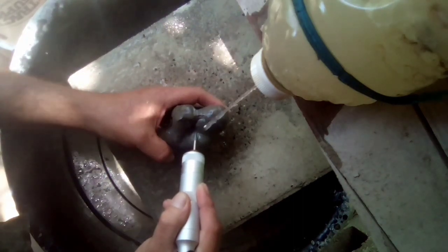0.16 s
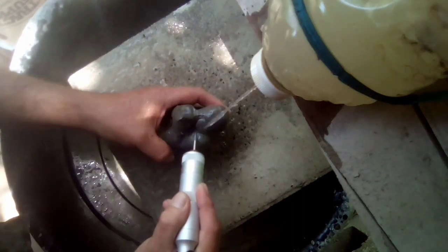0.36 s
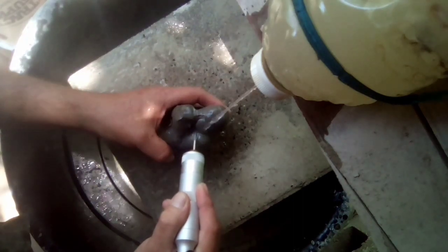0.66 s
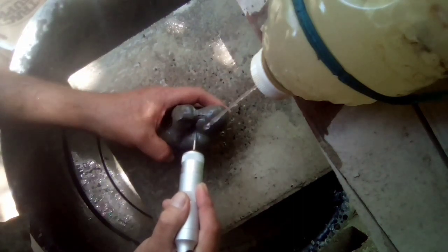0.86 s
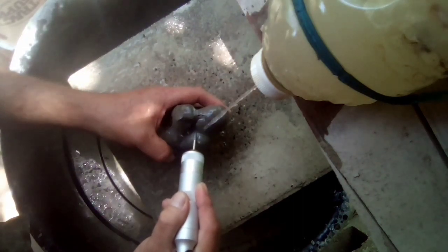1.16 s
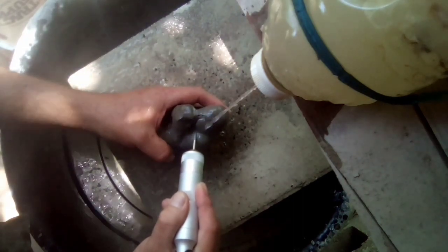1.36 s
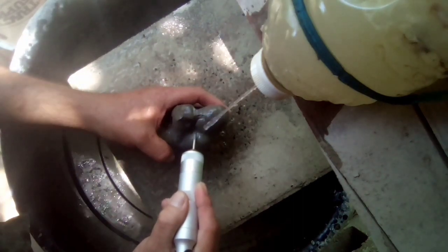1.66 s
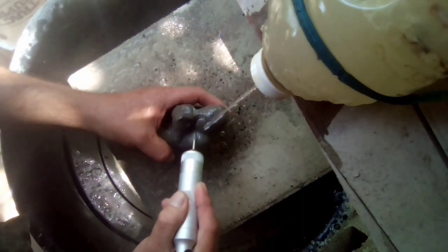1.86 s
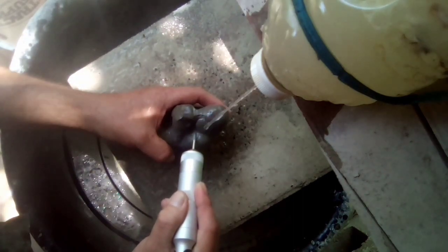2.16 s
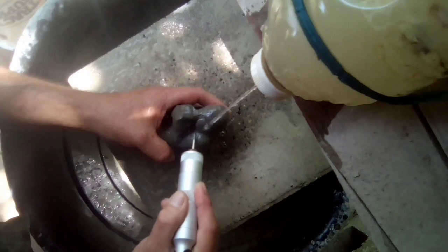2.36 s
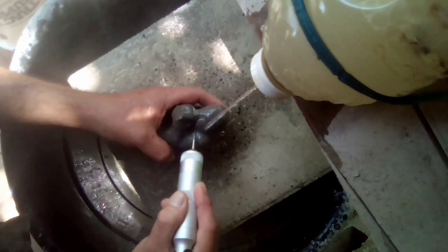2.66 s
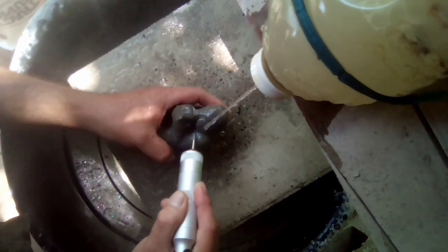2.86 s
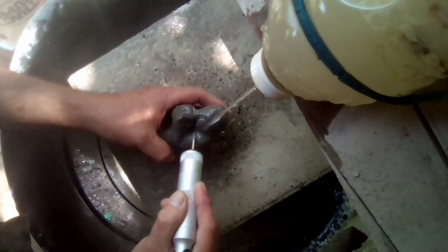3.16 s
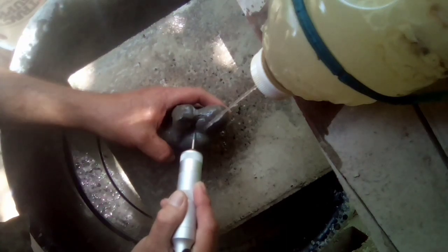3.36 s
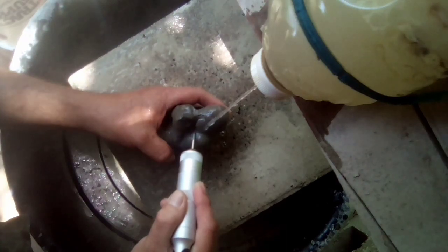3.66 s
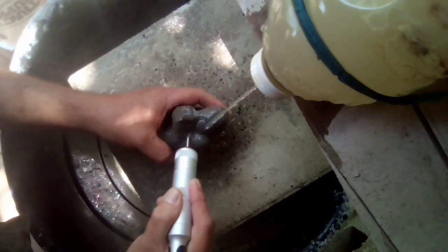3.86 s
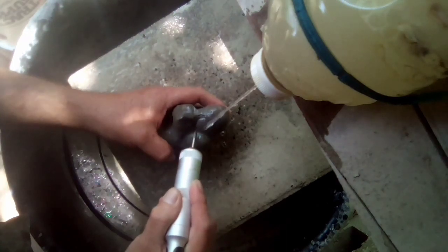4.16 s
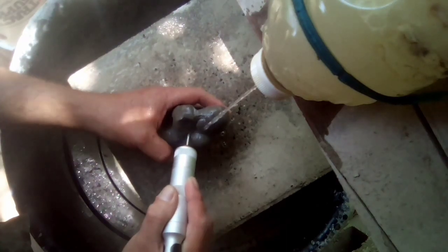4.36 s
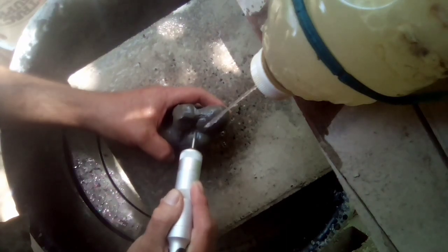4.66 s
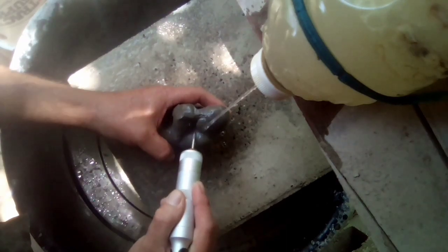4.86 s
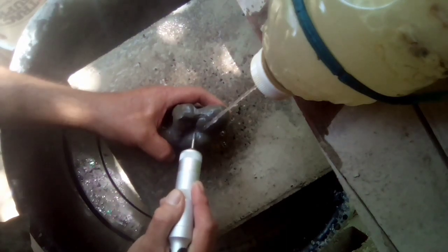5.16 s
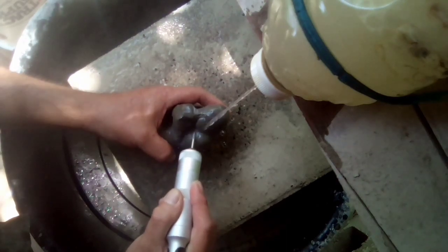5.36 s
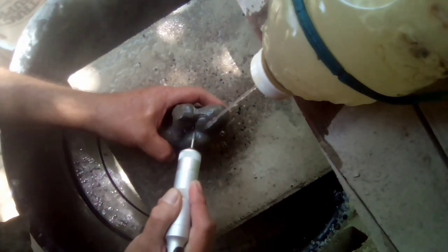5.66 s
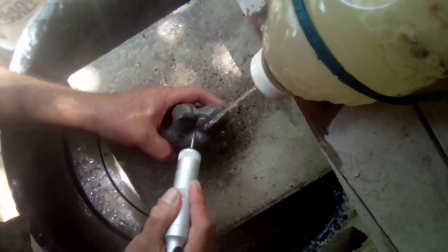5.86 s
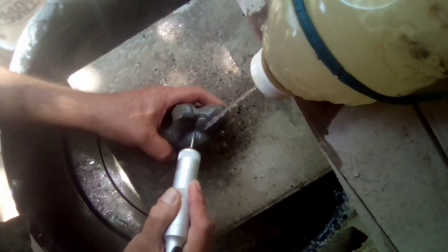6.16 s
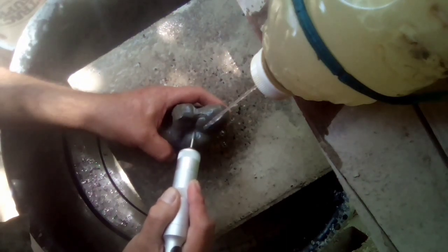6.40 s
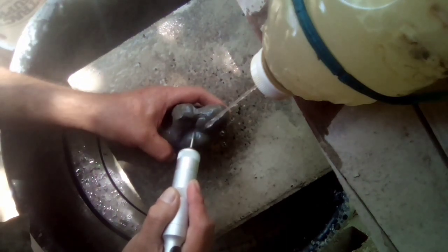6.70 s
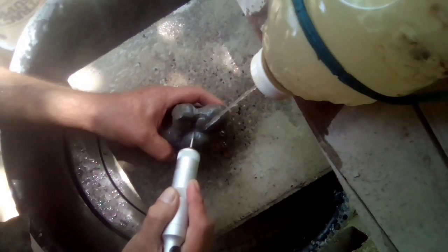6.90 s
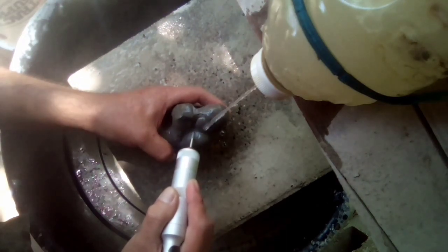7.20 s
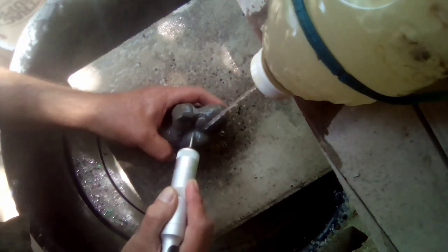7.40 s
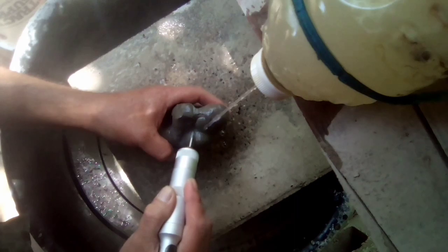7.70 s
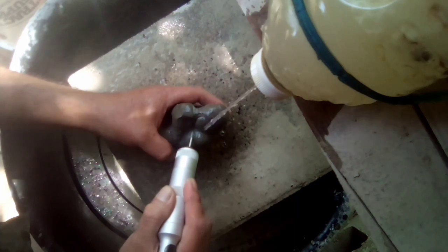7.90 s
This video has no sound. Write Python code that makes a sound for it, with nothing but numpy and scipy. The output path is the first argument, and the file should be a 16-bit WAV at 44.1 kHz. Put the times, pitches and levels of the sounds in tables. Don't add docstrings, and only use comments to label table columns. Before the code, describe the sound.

A continuous mechanical whine of a handheld grinding tool, rich in buzzing tones, mixed with sandy, spraying hiss from bit on wet rock. It starts under firm load, lightens halfway with a small upward pitch shift and a brief sizzle, then returns to a slightly smoother grind. Dry, close, centred mono outdoor sound, with a barely audible low hum far away.

```python
import sys
import numpy as np
from scipy import signal
from scipy.fft import rfft, irfft, next_fast_len
from scipy.io import wavfile
from scipy.ndimage import uniform_filter1d, map_coordinates

SR = 44100
rng = np.random.default_rng(int(sys.argv[2]) if len(sys.argv) > 2 else 0)


def store_pcm(level_fs):
    pcm = np.round(np.clip(level_fs, -1, 1) * 32767).astype(np.int16)
    wavfile.write(sys.argv[1], SR, np.atleast_2d(pcm).T)


def boost_factor(decibels):
    exponent = np.asarray(decibels, float) / 20
    return 10 ** exponent


N = 354563
TIME = np.arange(N) / SR
MOST_TURNS = int(N / SR * 140)


def unit(x):
    return x / np.sqrt(np.mean(x ** 2))


def walk(rate_hz):
    fine = np.repeat(rng.standard_normal(400), 16)
    for _ in range(2):
        fine = uniform_filter1d(fine, 16)
    return np.interp(TIME * np.clip(rate_hz, .1, 45) * 16, np.arange(len(fine)), unit(fine))


def tone(turns, db, offset=0):
    return np.sqrt(2) * boost_factor(db) * np.cos(2 * np.pi * turns + offset)


# start_s, shaft_hz
SHAFT_SPEED = [(0, 133.08), (.5, 132.9), (1, 132.72), (1.25, 132.86), (1.75, 132.9), (2, 133.03),
               (2.75, 133.11), (3.5, 133.35), (4, 133.54), (4.25, 134.57), (4.75, 135.6), (5.25, 135.52),
               (5.75, 134.45), (6.25, 133.88), (6.75, 133.62), (7.5, 133.57), (8.04, 133.45)]


def shaft():
    shaft_hz = np.interp(TIME, *np.transpose(SHAFT_SPEED))
    turns = np.cumsum(shaft_hz + .04 * walk(9)) / SR
    return shaft_hz, turns


MOTOR_ORDERS = [
    1,
    2,
    18,
    48,
]
# level_db at loaded speed, slope_db per Hz faster, bend_db per Hz squared
MOTOR_LEVELS = [
    (-56, 2.9, -0.33),
    (-44, 1.6, -0.1),
    (-39, -0.56, 0.02),
    (-34.5, 1.4, -0.46),
]
# multiple of shaft speed, level_db
BALL_RACE = (23.11, -57)


def motor(shaft_hz, turns):
    faster_hz = shaft_hz - 133.3
    race_order, race_db = BALL_RACE
    out = tone(race_order * turns, race_db + 3.4 * walk(3.4))
    for order, (loaded_db, slope, bend) in zip(MOTOR_ORDERS, MOTOR_LEVELS):
        db = loaded_db + slope * faster_hz + bend * faster_hz ** 2
        out = out + tone(order * turns, db + .5 * walk(9))
    return out


# multiple of shaft speed, pressing_db, eased_off_db
CUT = [(3, -48.5, -51), (7, -60, -56), (8, -64, -56), (11, -56, -54), (15, -53, -52), (16, -50, -50),
       (22, -53, -59), (23, -58, -50), (24, -43, -41.5), (29, -54, -48), (30, -51, -52), (31, -47, -57),
       (37, -51, -49), (39, -60, -48), (40, -44, -47), (41, -59, -49), (42, -49, -47), (43, -47, -46),
       (44, -43, -45.5), (45, -46, -54), (46, -46, -46), (47, -45, -50), (50, -45.5, -48), (58, -60, -62),
       (60, -60, -69), (70, -61, -64), (72, -72, -67), (74, -69, -68), (76, -71, -67), (110, -69, -67)]
CUT_STAGES = [
    0,
    3.95,
    4.2,
    5.7,
    6.2,
]
STEADY_ORDERS = (3, 7, 8, 24, 58, 60, 70, 72, 74, 76, 110)


def cut_tones(turns):
    return_share, worn_db = .3, -1.5
    smear = .05
    out = 0
    for order, press_db, ease_db in CUT:
        again_db = press_db + return_share * (ease_db - press_db) + worn_db
        db = np.interp(TIME, CUT_STAGES, (press_db, press_db, ease_db, ease_db, again_db))
        wander = .03 if order in STEADY_ORDERS else .07
        lag = np.pi * smear * (order - MOTOR_ORDERS[-1]) ** 2 * (order > 4)
        swell = np.sqrt(1 - wander) + np.sqrt(wander / 2) * walk(11)
        drift = np.sqrt(wander / 2) * walk(6)
        out = out + swell * tone(order * turns, db + .3, lag + drift)
    return out


def grit(turns):
    memory, count = .97, 256
    fresh = rng.standard_normal((MOST_TURNS, count))
    pattern = rfft(signal.lfilter([1], [1, -memory], fresh, axis=0))
    sounding = [int(row[0]) for row in CUT] + list(MOTOR_ORDERS)
    pattern[:, sounding] *= .45
    return map_coordinates(unit(irfft(pattern, count)).ravel(), [turns * count], order=3)


def chips(turns):
    scatter_db, slip_turns = 4.0, .03
    chance = rng.standard_normal((MOST_TURNS, 2))
    strikes = np.arange(MOST_TURNS) + slip_turns * chance[:, 0]
    moments = np.interp(strikes, turns, np.arange(N))
    inside = moments < N - 1
    blows = boost_factor(scatter_db * chance[:, 1]) * np.sign(chance[:, 0])
    out = np.zeros(N)
    out[moments.astype(int)[inside]] = blows[inside]
    return unit(out)


# pitch_hz, level_db per Hz
HISS = [(25, -46), (100, -22), (230, -15), (330, -18), (900, -11.5), (1350, -13), (2000, -9), (3700, -8.5),
        (5700, -1), (6600, -2.5), (8400, -20.5), (11000, -27.5), (13700, -32), (14800, -23)]
# pitch_hz, width_hz, level_db above the hiss
CASING = [(205, 13, 4), (388.4, 59, 10.5), (447, 116, 6.5), (657.4, 118, 12.5), (751, 38, 8),
          (1014, 20, -4.5), (1175, 60, -5), (1640, 70, 6), (2350, 350, 4.5), (2830, 90, 3), (3150, 70, -4),
          (3395, 70, 4), (3860, 100, -4), (4230, 59, -3), (4414, 240, 5), (4610, 200, -1.5), (5190, 70, -5),
          (5390, 110, -3.5), (6080, 71, -3.5), (6630, 130, 2), (7400, 430, 3)]


def casing_colour(hz):
    pitch_hz, level_db = np.transpose(HISS)
    colour = boost_factor(np.interp(np.log(hz), np.log(pitch_hz), level_db))
    for centre_hz, width_hz, db in CASING:
        colour = colour * boost_factor(db / (1 + (2 * (hz - centre_hz) / width_hz) ** 2))
    return colour


def hiss(turns, rush_db, cut_db, spray_db):
    angle = 2 * np.pi * turns
    pulse = boost_factor(1.5 * np.cos(angle) + .8 * np.cos(3 * angle))
    size = next_fast_len(N)
    hz = np.maximum(np.arange(size // 2 + 1) * SR / size, 1)
    loose = pulse * rng.standard_normal(N) + boost_factor(-19) * chips(turns)
    grains = rfft(grit(turns), size) * boost_factor(-8) / np.sqrt(1 + (800 / hz) ** 4)
    spectrum = (rfft(loose, size) + grains) * casing_colour(hz)
    swings_db = [db - db.mean() for db in (rush_db, cut_db, spray_db)]
    chatter_db = 0.33 * walk(40)
    droplets_db = .4 * tremor()
    out = 0
    for centre_hz in 100 * 2 ** np.arange(-2, 8, .5):
        window = np.clip(1 - 2 * np.abs(np.log2(hz / centre_hz)), 0, 1)
        zone = int(centre_hz > 1000) + int(centre_hz > 8000)
        flicker_db = 0.24 * walk(30)
        if zone == 2:
            flicker_db = flicker_db + droplets_db
        band = irfft(spectrum * window, size)[:N]
        out = out + band * boost_factor(1.02 * swings_db[zone] + chatter_db + flicker_db)
    return unit(out) * boost_factor(-28.5)


def tremor():
    band = signal.butter(2, (4, 16.4), "bandpass", fs=100, output="sos")
    coarse = signal.sosfilt(band, rng.standard_normal(900))
    return np.interp(TIME * 100, np.arange(-50, 850), unit(coarse))


# start_s, pressure_db
PRESSURE = [(0, 1.7), (.45, 1.2), (.9, 1), (1.1, 1.5), (1.28, 0.7), (1.5, 0.9), (2.3, 0.7), (2.55, 1),
            (3.95, 0.5), (4.2, 0.8), (4.55, 0.7), (4.75, 0.4), (5.4, 0.5), (6.05, 0), (6.9, 0.14),
            (7.7, 0.), (8.04, -0.5)]
# pressure share, tremor_db, drift_db per s
FOLLOW = [
    (1.2, 0, -0.02),
    (1.3, 0.57, 0.17),
    (1.1, 0.55, 0.17),
]


def hand():
    pressure_db = np.interp(TIME, *np.transpose(PRESSURE))
    shake = tremor()
    tones_db = 0.46 * shake + .7 * pressure_db
    rush_db, cut_db, spray_db = (share * pressure_db + db * shake + drift * TIME
                                 for share, db, drift in FOLLOW)
    gusts_db = 0.52 * tremor()
    return tones_db, rush_db + gusts_db, cut_db, spray_db


# middle_s, length_s, pitch_hz, width_hz, level_db
SKID = (4.47, 0.7, 7050, 200, -40.5)


def skid():
    middle_s, length_s, hz, width_hz, db = SKID
    edges_hz = (hz - width_hz / 2, hz + width_hz / 2)
    band = signal.butter(2, edges_hz, "bandpass", fs=SR, output="sos")
    swell = np.exp(-(2 * (TIME - middle_s) / length_s) ** 4)
    return boost_factor(db) * swell * unit(signal.sosfilt(band, rng.standard_normal(N)))


# start_s, pitch_hz, level_db
FAR_MOTOR = [(0, 163.1, -58.5), (4, 161.4, -60.5), (6.5, 159.7, -58.5), (8.04, 158, -61)]


def far_motor():
    start_s, pitch_hz, level_db = np.transpose(FAR_MOTOR)
    cycles = np.cumsum(np.interp(TIME, start_s, pitch_hz)) / SR
    return tone(cycles, np.interp(TIME, start_s, level_db))


def scene():
    shaft_hz, turns = shaft()
    tones_db, rush_db, cut_db, spray_db = hand()
    mono = motor(shaft_hz, turns) + boost_factor(tones_db) * cut_tones(turns)
    mono = mono + hiss(turns, rush_db, cut_db, spray_db)
    mono = mono + skid() + far_motor()
    return np.array([mono, mono])


def band_limit(x):
    return signal.sosfilt(signal.butter(12, 16860, fs=SR, output="sos"), x)


def record(dry):
    size = next_fast_len(N)
    hz = np.arange(size // 2 + 1) * SR / size
    rounded = np.tanh(3 * dry) / 3
    mix = irfft(rfft(rounded, size) * (hz < 15495), size)[:, :N]
    return band_limit(mix)


dry = scene()
out = record(dry)
store_pcm(out)
```